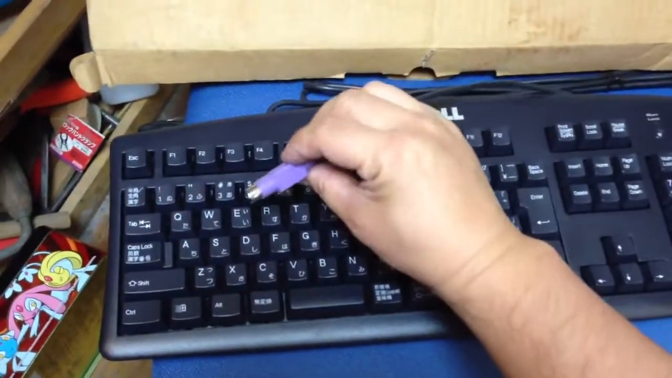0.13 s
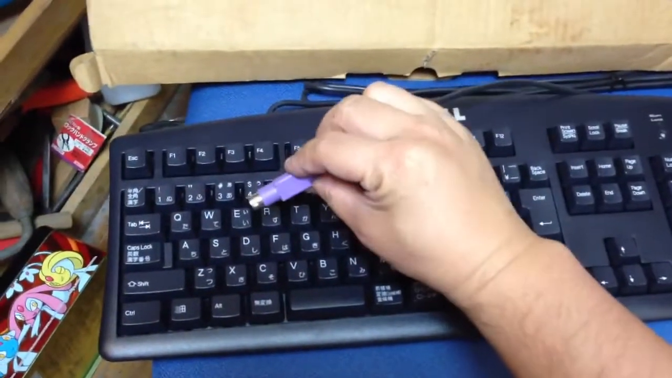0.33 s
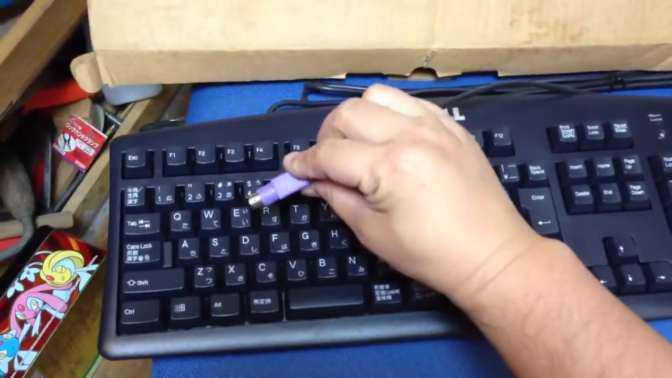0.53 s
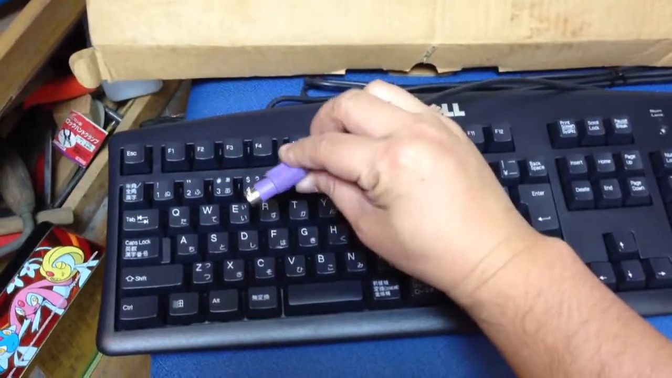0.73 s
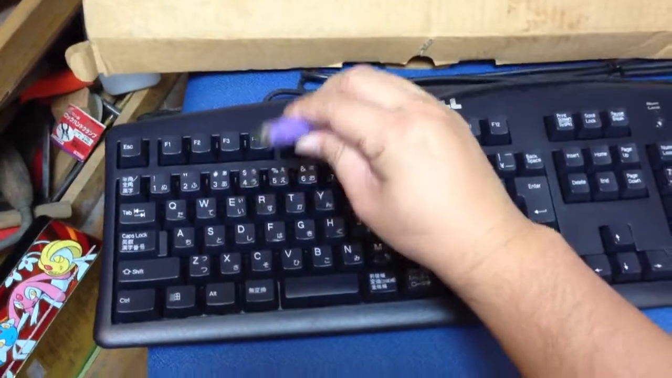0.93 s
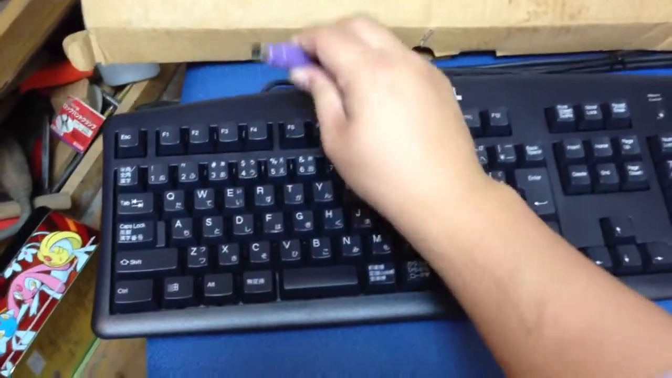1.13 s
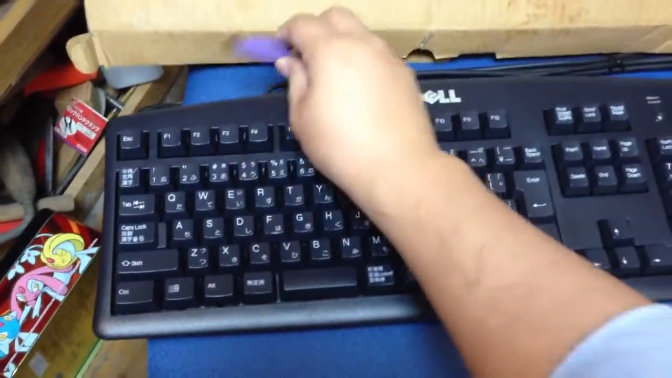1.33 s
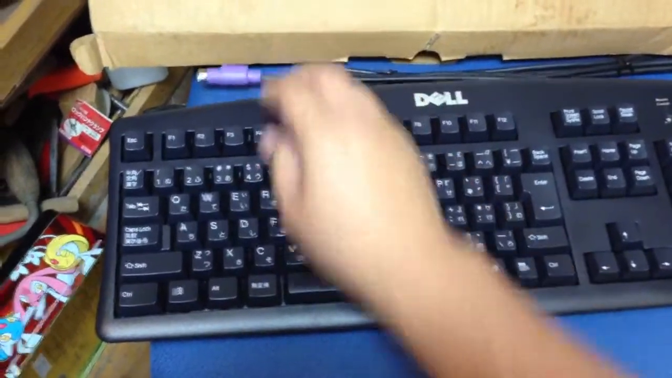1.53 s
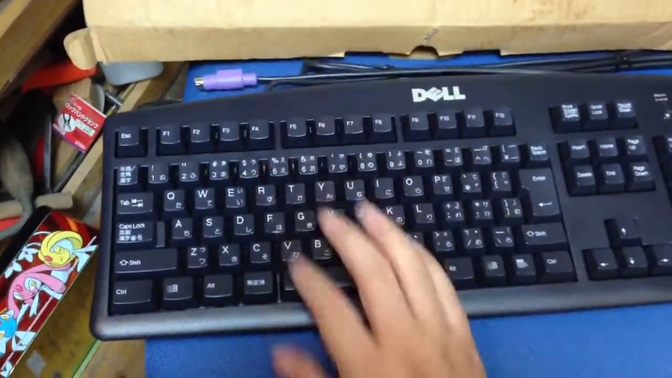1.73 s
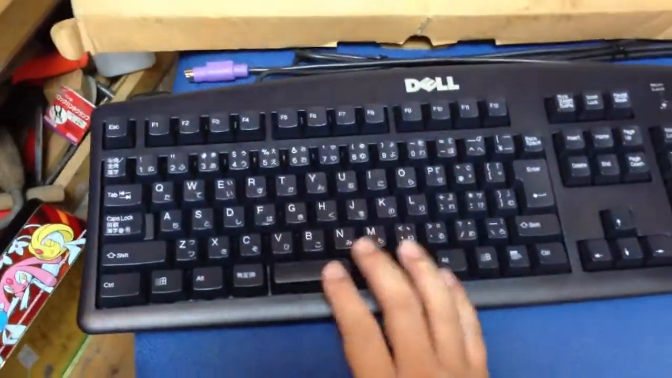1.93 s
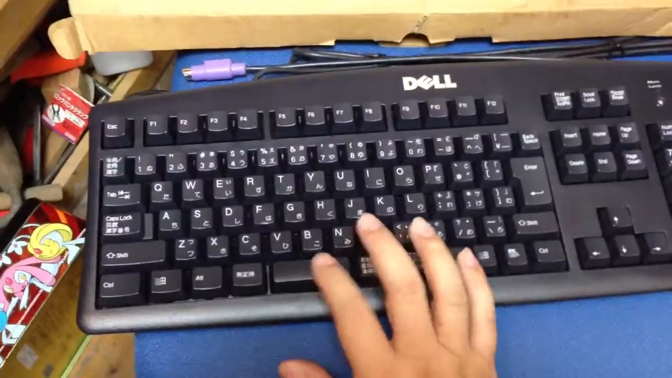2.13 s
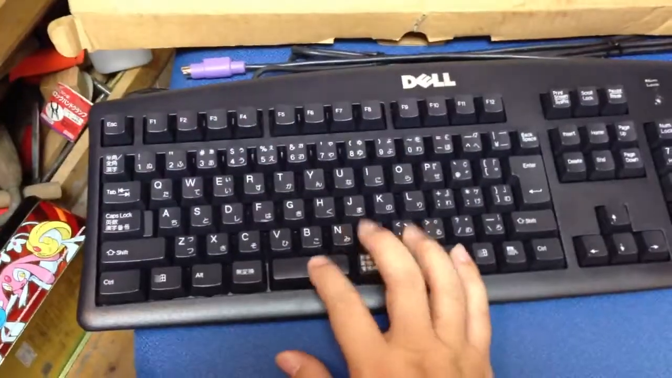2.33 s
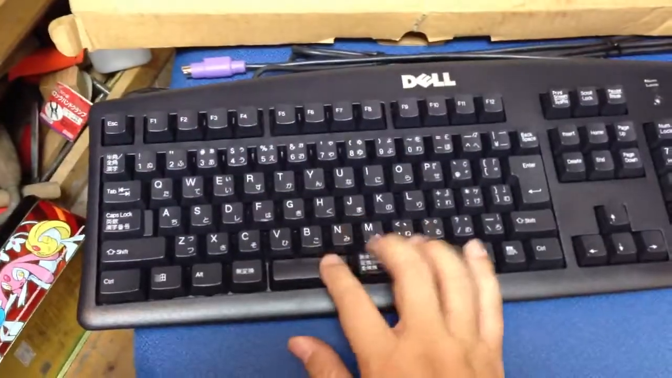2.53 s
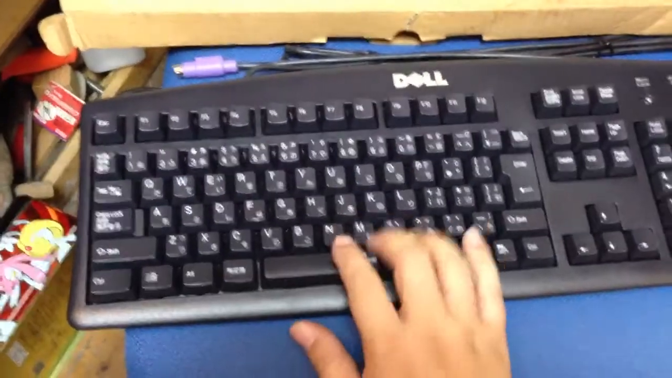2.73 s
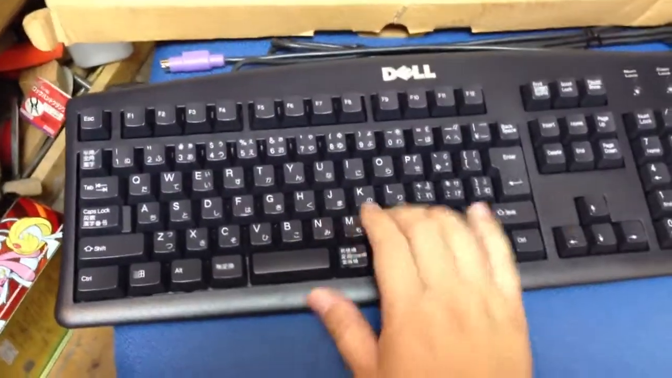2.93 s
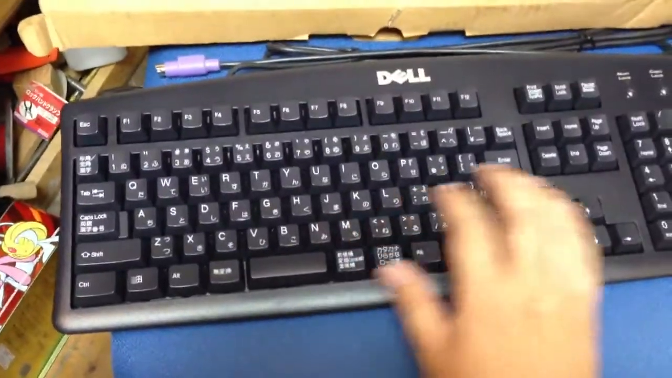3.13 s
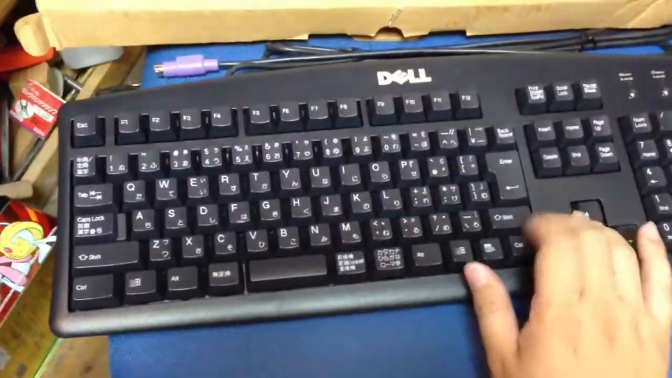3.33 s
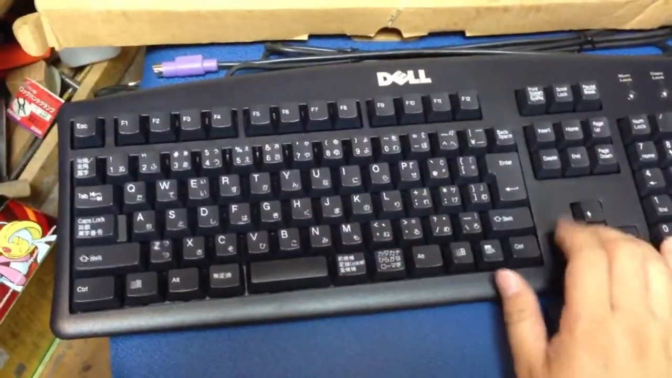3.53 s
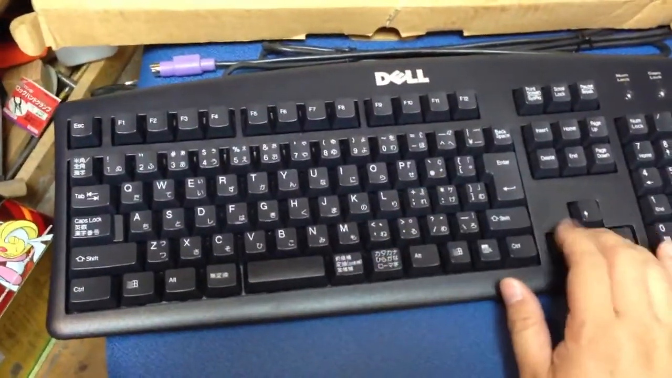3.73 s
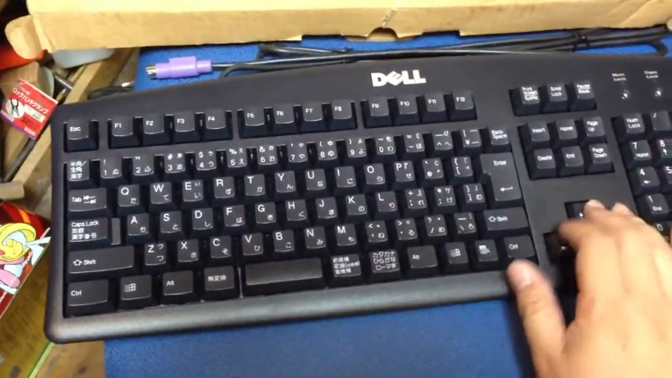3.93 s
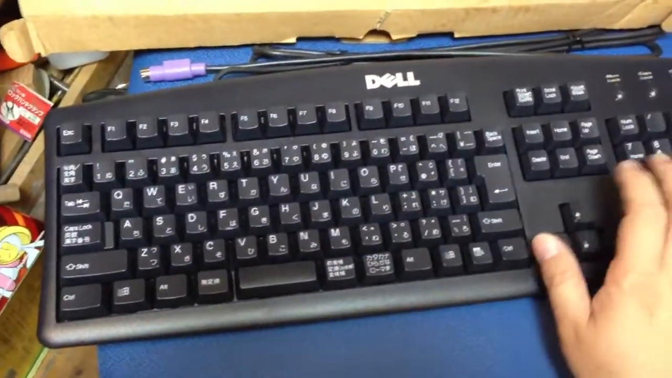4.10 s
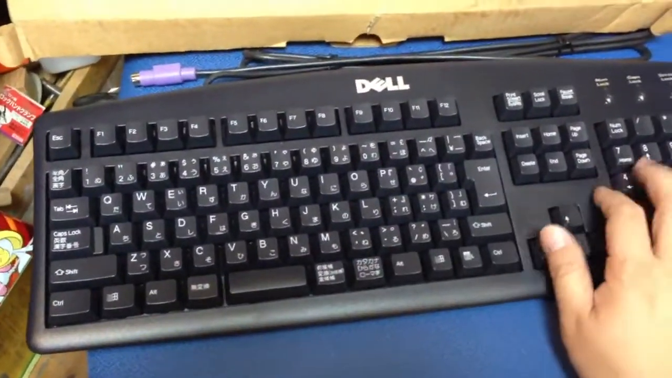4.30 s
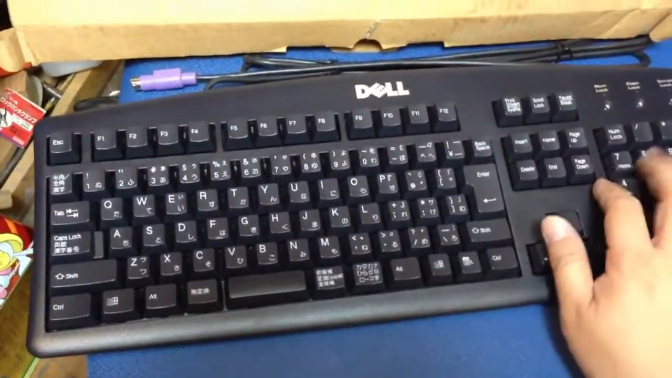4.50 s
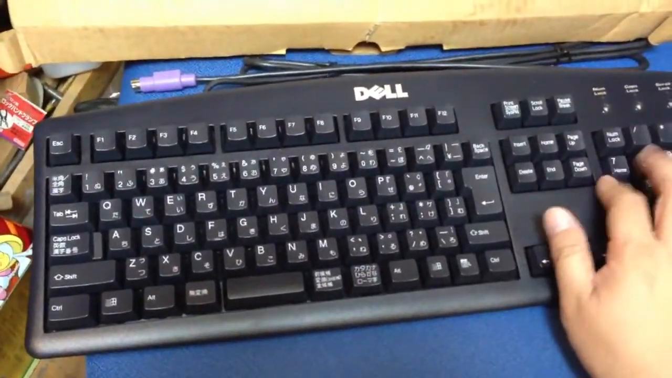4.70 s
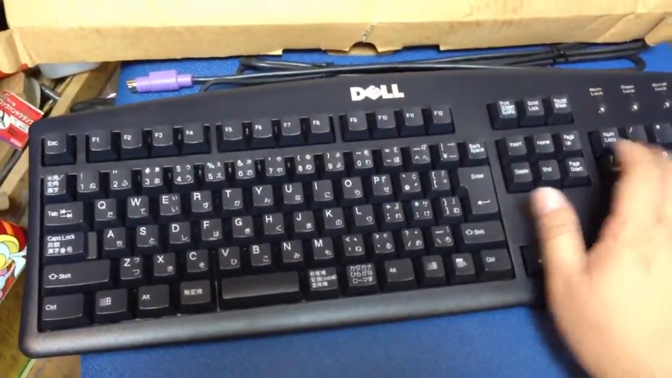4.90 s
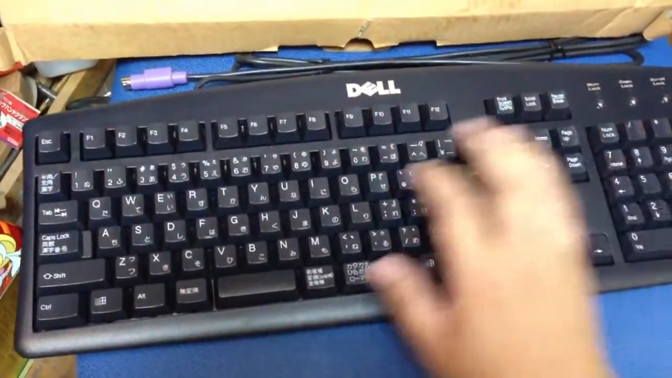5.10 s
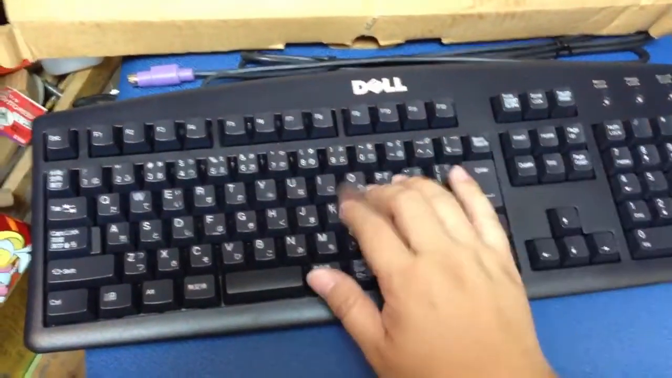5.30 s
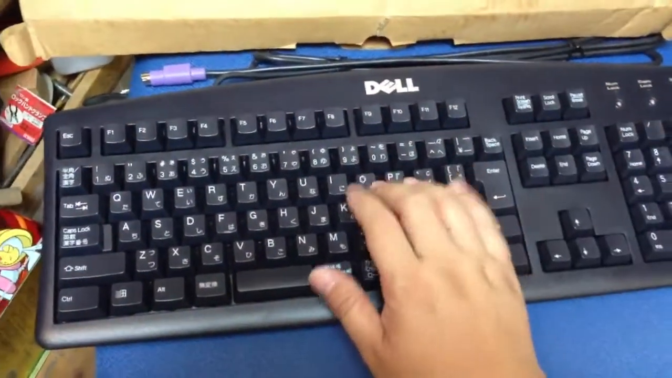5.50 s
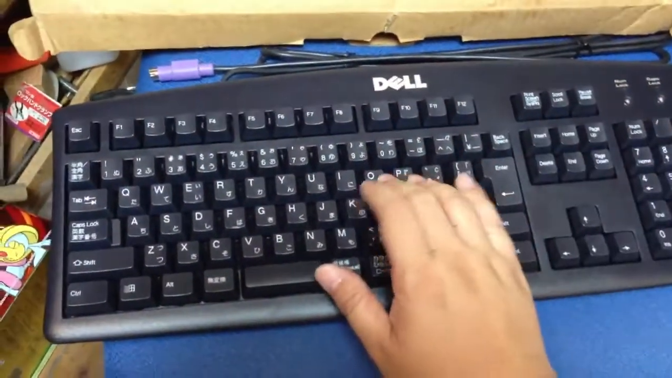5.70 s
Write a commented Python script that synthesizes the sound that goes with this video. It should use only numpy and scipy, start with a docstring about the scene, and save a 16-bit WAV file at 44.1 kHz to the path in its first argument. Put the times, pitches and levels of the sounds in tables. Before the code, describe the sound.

In a quiet room with a low electrical hum and faint fan noise, a close microphone picks up soft rustles of fingers on a plastic plug and its cable. The plug is put down, and typing begins on a computer keyboard: dry, rattly clacks of varying strength, growing denser, pausing briefly, then ending with a few more strokes.

```python
"""Loose keys tapped across a keyboard on a desk, close to the microphone, in a quiet room.
Each stroke is a few contacts (cap, stem, bottoming out, rebound) that rattle the plastic and thud
into the case. Before the typing, a hand turns a small plastic plug over and lays it down.
Desk and walls answer with short echoes; a mains hum and fan noise lie behind it all."""
import sys
import numpy as np
from scipy import signal
from scipy.fft import rfft, irfft, next_fast_len
from scipy.io import wavfile

SR = 44100
rng = np.random.default_rng(int(sys.argv[2]) if len(sys.argv) > 2 else 0)


def materialize(psi):
    """Save the field psi as 16-bit PCM at rate SR to the path in sys.argv[1].

    A 1-D psi becomes a single channel; in a 2-D psi each row is a channel.
    """
    bounded = np.clip(np.atleast_2d(psi).T, -1, 1)
    quanta = np.round(bounded * 32767).astype(np.int16)
    wavfile.write(sys.argv[1], SR, quanta)


N = 253707


def from_db(db):
    """Decibels to gain."""
    return 10 ** (np.asarray(db) / 20)


def unit_rms(x):
    """Scale to rms 1 along the last axis."""
    return x / np.sqrt(np.mean(x ** 2, axis=-1, keepdims=True) + 1e-20)


def unit_energy(rows):
    """Scale each row to a summed power of 1."""
    return rows / np.sqrt(np.sum(rows ** 2, axis=1, keepdims=True))


def at_hz(hz, points_hz, values):
    """Straight lines on a log-frequency axis."""
    return np.interp(np.log(hz), np.log(points_hz), values)


# Noise floor at the microphone: (frequency [Hz], relative density [dB])
FAN_SPECTRUM = [(90, -9.5), (130, -7), (160, 1.5), (178, 5.5), (205, -2.5), (240, -1), (300, -4.5),
                (380, -6.5), (520, -14.5), (720, -10), (1100, -14), (1600, -18.5), (2300, -21.5),
                (3200, -25.5), (8000, -28.5), (15000, -31)]


def fan(level_db):
    """Room tone: low fan rumble that thins into microphone hiss."""
    size = next_fast_len(N)
    hz = np.maximum(np.arange(size // 2 + 1) * SR / size, 1)
    colour = from_db(at_hz(hz, *np.transpose(FAN_SPECTRUM)))
    noise = irfft(rfft(rng.standard_normal(size)) * colour, size)[:N]
    return from_db(level_db) * unit_rms(noise)


def hum(hz, level_db, waver_db, wavers_per_s):
    """The fourth mains harmonic in the background, its level wavering a little."""
    t = np.arange(N) / SR
    drift = np.interp(t * wavers_per_s, np.arange(100), rng.standard_normal(100))
    return from_db(level_db + waver_db * drift) * np.sqrt(2) * np.sin(2 * np.pi * hz * t)


# Echoes around the desk: (frequency [Hz], t60 [s], relative level [dB])
ROOM_DECAY = [(705, 0.11, 5), (1440, 0.097, 2), (4300, 0.11, 3), (8200, 0.072, 2), (12400, 0.1, -1)]


def room_tails(count, size, onset_ms, level_db=-7, walls_db=-21.5, walls_t60_ratio=5.1):
    """Each contact has its own dense tail: the desk answers first, the far walls fainter and longer."""
    t = np.arange(size) / SR
    room_hz, *columns = np.transpose(ROOM_DECAY)
    white = rng.standard_normal((count, size))
    edges_hz = np.geomspace(500, 16000, 11)
    tails = 0
    for low, high in zip(edges_hz, edges_hz[1:]):
        band = signal.sosfilt(signal.butter(2, [low, high], "band", fs=SR, output="sos"), white)
        t60, band_db = (at_hz(np.sqrt(low * high), room_hz, column) for column in columns)
        near = from_db(-60 * t / t60)
        far = from_db(walls_db - 60 * t / t60 / walls_t60_ratio)
        tails = tails + band * from_db(band_db) * (near + far)
    build_up = 1 - np.exp(-t * 1000 / onset_ms)
    return from_db(level_db) * unit_energy(tails * build_up)


def ring(forces, modes, share_db, detune_hz, spread_db):
    """Every row of force rings all modes; no two contacts are tuned or weighted quite alike."""
    hz, mode_db, t60 = np.transpose(modes)[:, None, :, None]
    chance = rng.standard_normal((len(forces), len(modes), 2))
    t = np.arange(round(.08 * SR)) / SR
    decay = from_db(mode_db + share_db + spread_db * chance[..., :1] - 60 * t / t60)
    sign = (-1.) ** np.arange(len(modes))[:, None]
    tones = np.sin(2 * np.pi * (hz + detune_hz * chance[..., 1:]) * t)
    response = np.sum(sign * decay * tones, axis=1)
    return unit_energy(signal.fftconvolve(forces, response, axes=1))


# Low modes of the keyboard case: (frequency [Hz], relative level [dB], t60 [s])
CASE_MODES = [(258.5, -8.5, 0.045), (317, -2, 0.052), (352.3, -1.5, 0.044), (424, -6.5, 0.04),
              (510, -2, 0.039), (605, -8, 0.02)]
# Centres of the deep and the shallow thud: (frequency [Hz])
THUD_BANDS = [304, 467]


def case_thud(push, thud_lean_db):
    """The case thuds under a push; a positive lean favours its deep modes."""
    mode_hz = np.array(CASE_MODES)[:, :1]
    share_db = np.array([at_hz(mode_hz, THUD_BANDS, [lean / 2, -lean / 2]) for lean in thud_lean_db])
    return ring(push, CASE_MODES, share_db, detune_hz=14.1, spread_db=2.5)


# Modes of the key caps and stems: (frequency [Hz], relative level [dB], t60 [s])
CAP_MODES = [(737, -8.5, 0.017), (1140, -9, 0.0066), (1215, -4, 0.0094), (1523, -3.5, 0.013),
             (1744, 1.5, 0.0078), (2100, 2.5, 0.0062), (2398, 1.5, 0.0074), (2746, 1.5, 0.0056),
             (3020, -2, 0.0054), (3290, -7.5, 0.0078), (3835, -4.5, 0.01), (4180, -1.5, 0.01),
             (4720, -0.5, 0.0072), (5350, 3, 0.0064), (6180, 4, 0.0037), (7000, 2.5, 0.0046),
             (8046, 3, 0.0042), (8800, 4, 0.003), (9900, 7.5, 0.0015), (11300, -13, .003),
             (11200, -23, 0.0016), (12470, 0.5, 0.0037), (14100, 8, 0.0012), (13700, 3.5, 0.0021)]
# Band centres of cap edge, deep cap, shallow cap, snap, tick and top: (frequency [Hz])
CAP_BANDS = [800, 1600, 3300, 5400, 7900, 11500]


def strike_plastic(forces, push, start, level_db, lean_db, snap_db, tick_db, top_db,
                   thud_db, thud_lean_db):
    """Forces ring the caps, weighted by where the plastic is touched; the push rings the case."""
    bands_db = np.transpose([(thud_db + lean_db) / 2, lean_db / 2, -lean_db / 2,
                             snap_db, tick_db, top_db])
    mode_hz = np.array(CAP_MODES)[:, :1]
    share_db = np.array([at_hz(mode_hz, CAP_BANDS, row) for row in bands_db])
    caps = ring(forces, CAP_MODES, share_db, detune_hz=108, spread_db=1.8)
    case = from_db(thud_db)[:, None] * case_thud(push, thud_lean_db)
    sound = from_db(level_db)[:, None] * (caps + case)
    index = start[:, None] + np.arange(sound.shape[1])
    return np.bincount(index.ravel(), sound.ravel(), N)[:N]   # add each contact at its start sample


def uneven_clicks(shape, per_s, size_db=3.0):
    """Sparse clicks of random sign and heavy-tailed size; mean power 1 a row."""
    draw = rng.random((*shape, 3))
    occurs = draw[..., 0] < per_s / SR
    size = from_db(size_db * np.minimum(-np.log(draw[..., 1] + 1e-9), 4))
    return unit_rms(occurs * size * np.sign(draw[..., 2] - .5))


def finger_landings(ahead_ms=6, level_db=-54, tick_db=-20, thud_db=-19, half_ms=2.8):
    """The finger brushes the cap just ahead of every stroke: more rows for the rubs."""
    return [(s + (min(other_ms, 0) - ahead_ms) / 1000, level_db, lean_db, tick_db, thud_db, half_ms)
            for s, _, lean_db, *_, other_ms, _ in KEY_STROKES]


# Fingers on plug, cable and caps, close by:
# (centre time [s], relative level [dB], deep-cap lean [dB], tick [dB], thud [dB], half length [ms])
RUBS = [(0.171, -54.5, 5, -5, -12, 20), (0.24, -52, 4, 0, -27, 8.5), (0.368, -54, -5, -5.5, -35, 17),
        (0.821, -59, -2, -4, -18, 8.1), (0.913, -51, 8, -0.5, -9, 15), (1.128, -45, 13, -10, -8, 15),
        (1.17, -59.5, -17, -1, 0.5, 86), (1.206, -50.5, 4, -9, 5, 26), (1.253, -54, 12, -8, -10, 16),
        (1.499, -54, 18, -12, 0, 19), (1.641, -63, 11, -6, -24, 67), (1.864, -51, -2, -9, -2, 7.2),
        (2.768, -51, 0, -22, -9, 7.7), (2.993, -53, 3, -11, -30, 8.3), (3.022, -51.5, 3, -19, -2, 13.4),
        (3.491, -49, 11, -14, -7, 4.5), (3.614, -52, 6, -21, -5, 3.8), (3.66, -48, 9, -14, -17, 7.1),
        (3.991, -45.5, 4, -8, -11, 3.9), (4.023, -48, 26, -15, -8, 4.9), (3.85, -48.5, 7, -9, -9, 9.1),
        (4.179, -43.5, -14, -37, -21, 4.5), (4.508, -51.5, 2, -12, -12, 12), (5.447, -47, -3, -13, -9, 5.9)]


def finger_rubs(top_under_tick_db, thud_lean_db, gain_db):
    """Rubbing is a swell of dense tiny catches, each with its echoes."""
    s, level_db, lean_db, tick_db, thud_db, half_ms = np.transpose(RUBS + finger_landings())
    lead = 5000   # samples before the centre of the swell
    ms = np.arange(-lead, lead) / SR * 1000
    half_ms = np.clip(half_ms, 1, 60)
    swell = np.exp(-(ms / half_ms[:, None]) ** 2)
    catches = swell * uneven_clicks(swell.shape, per_s=5700)
    path = room_tails(count=len(s), size=5000, onset_ms=6.4)
    path[:, 0] = 1   # the direct sound
    forces = signal.fftconvolve(catches, path, axes=1)
    level_db = level_db + 10 * np.log10(half_ms)   # a longer rub carries more energy
    start = np.round(s * SR).astype(int) - lead
    return from_db(gain_db) * strike_plastic(
        forces, forces, start, level_db, lean_db, snap_db=tick_db, tick_db=tick_db,
        top_db=tick_db - top_under_tick_db, thud_db=thud_db, thud_lean_db=np.full_like(s, thud_lean_db))


# The high sheen of the plug and key clicks over time: (time [s], relative level [dB])
CLICK_SHEEN = [(1.45, -24), (1.8, -6), (2.05, -3.5), (2.15, -8), (2.4, -19), (2.7, -4), (3.1, -23),
               (3.4, -20), (3.6, -14), (4.2, -17.5), (4.7, -16), (5.3, -15), (5.7, -14.5)]


def bright_bands(s, tick_db):
    """Levels of a contact's snap and top bands; both rise with its tick."""
    snap_db = -14 + .3 * tick_db
    top_db = np.interp(s, *np.transpose(CLICK_SHEEN)) + .53 * tick_db
    return snap_db, top_db


# On the desk, close by: the plug laid down, then the keys.
# (time of firmest contact [s], relative level [dB], deep-cap lean [dB], tick [dB], thud [dB],
#  rattle decay [ms], other contact's delay [ms], its level under the firmest [dB])
KEY_STROKES = [(1.4497, -34.5, -3, -21, -8, 2.8, 3.5, 20), (1.8186, -28.5, -3, -10, -11, 5.8, 0.5, 18),
               (1.941, -40, -11, -12, -3.5, 6, -5, 1.5), (2.0446, -24.5, -13, -4.5, -7.5, 1.7, 7, 3),
               (2.1435, -36.5, -9.5, -9, -8.5, 3.5, 3, 5), (2.2338, -39, -5.5, -16, 5.5, 4, -6, -3),
               (2.362, -42, -6, -16, 1, 2.3, 1, 22), (2.4307, -21.5, 0.5, -11.5, -19, 5.5, -5.5, 2.5),
               (2.5456, -32, -7, -14, -2.5, 8.5, 22, 10), (2.6817, -27.5, -12, -10.5, -10, 9.2, -15, 0.5),
               (2.7915, -29, 0, -15.5, -12.5, 5.5, -5, 5), (2.8856, -32, 0, -13, -13, 4.5, -3.5, 4.5),
               (3.093, -43, -10, -10, -18, 4.5, 5, 22), (3.304, -28.5, -16, -8.5, -4.5, 5, 10, -1),
               (3.3183, -20, 2.5, -6.5, -4, 2.6, 18, 22), (3.401, -29.5, 6, -6.5, -33, 3, 14, 12.5),
               (3.4291, -38.5, -6, -34, -30, 5, -1, 15), (3.537, -29, 7.5, -14, -38, 7.9, -4.5, 11.5),
               (3.7576, -27.5, -1.5, -16, -13, 4.8, -6.5, 7.5),
               (3.8586, -27.5, -3.5, -17.5, -20, 3.1, -5, 12), (3.9477, -27, 6, -8, -12, 6.3, -8, 2),
               (4.0727, -37, 0.5, -10, -3, 6.3, -3.5, 1.5), (4.1862, -20, -5.5, -10.5, -16, 2.2, 7.5, 2.5),
               (4.2944, -36, 2.5, -4.5, -7, 9.3, 4.5, 19), (4.3276, -35, 10, -6, -4.5, 7.2, 2, 26),
               (4.396, -24, 8, -13.5, -17, 9.2, 5.5, 13), (4.528, -30.5, 13.5, -8, -7.5, 4.3, -3.5, 8),
               (4.6097, -17.5, 2, 1, -15, 2.9, 4.5, 17), (4.7178, -32, -4, -10, -18, 6.3, 9.5, 5),
               (4.8044, -19.5, 0, -12.5, -19.5, 5.4, 14.5, 24), (4.928, -41.5, 5.5, -7, -11, 11, -10, 1),
               (5.2662, -19.5, -7.5, -5, -3.5, 3.3, -7.5, 5.5),
               (5.356, -27, -0.5, -10.5, -10, 5.1, 26.5, 20), (5.464, -25, -5.5, -10.5, -6, 2.6, 9.5, 18),
               (5.5709, -30.5, -10, 3.5, -7.5, 2.1, -5, 7), (5.6427, -29, -5, -12.5, -4.5, 6.5, 6, 12.5),
               (5.699, -41, -5, -11, -10, 5, 3.5, 16)]


def contacts(rebound_ms=19, rebound_spread_ms=6.8, rebound_loss_db=21.5, rebound_rattle_ms=5.7):
    """Each stroke is its firmest contact, one other before or after it, and one bounce of the cap."""
    s, level_db, lean_db, tick_db, thud_db, rattle_ms, other_ms, loss_db = np.transpose(KEY_STROKES)
    bounce_ms = np.maximum(other_ms, 0) + rebound_ms + rebound_spread_ms * rng.uniform(-1, 1, len(s))
    late = np.r_[np.zeros_like(s), np.sign(other_ms), np.ones_like(s)]   # -1 before the firmest, 1 after
    s = np.r_[s, s + other_ms / 1000, s + bounce_ms / 1000]
    level_db = np.r_[level_db, level_db - loss_db, level_db - rebound_loss_db]
    rattle_ms = np.r_[rattle_ms, rattle_ms, np.full_like(rattle_ms, rebound_rattle_ms)]
    # A later contact bottoms out: it sounds deeper and thuds more.
    lean_db = np.tile(lean_db, 3) + 2.5 * late
    tick_db = np.tile(tick_db, 3) + .5 * late
    thud_db = np.tile(thud_db, 3) + 6.5 * late
    thud_lean_db = -15.5 - .48 * level_db   # lighter contacts thud deeper
    snap_db, top_db = bright_bands(s, tick_db)
    return s, level_db, lean_db, snap_db, tick_db, top_db, thud_db, thud_lean_db, rattle_ms


def keys(rattle_db, soft_hz, rise_ms, push_ms, gain_db):
    """The loose cap starts to chatter, hits firmly, rattles on its stem and settles; echoes follow."""
    s, *touch, rattle_ms = contacts()
    lead = 200   # samples of chatter before the hit
    ms = (np.arange(8000) - lead) / SR * 1000
    settle = np.exp(np.minimum(ms / rise_ms, -ms / np.clip(rattle_ms[:, None], .3, 12)))
    rattle = from_db(rattle_db) * settle * uneven_clicks(settle.shape, per_s=4000)
    pole = np.exp(-2 * np.pi * soft_hz / SR)   # rattle touches are gentler, hence duller, than the hit
    forces = signal.lfilter([1 - pole], [1, -pole], rattle)
    forces[:, lead] = 1   # the firm hit
    forces = unit_energy(forces)
    forces[:, lead:] += room_tails(count=len(s), size=len(ms) - lead, onset_ms=2.4)
    # The finger's weight follows the click.
    push = np.maximum(ms, 0) * np.exp(-np.abs(ms) / push_ms) * np.ones_like(forces)
    start = np.round(s * SR).astype(int) - lead
    return from_db(gain_db) * strike_plastic(forces, push, start, *touch)


def scene():
    """One microphone at the desk: keyboard and fingers close by, hum and fan behind."""
    typing = keys(rattle_db=-15, soft_hz=5140, rise_ms=1.0, push_ms=0.43, gain_db=18.5)
    rubbing = finger_rubs(top_under_tick_db=12, thud_lean_db=-0.5, gain_db=15)
    room_tone = hum(hz=240.2, level_db=-50.5, waver_db=1, wavers_per_s=12) + fan(level_db=-55.5)
    return (typing + rubbing + room_tone)[None]


def record(dry):
    """The microphone cuts the bass and adds its own faint low rumble; the top is cut steeply."""
    low_cut_hz, high_cut_hz, rumble_db = 148.5, 15330, -87
    x = signal.sosfilt(signal.butter(4, low_cut_hz, "high", fs=SR, output="sos"), dry)
    rumble_band = signal.butter(2, [40, 150], "band", fs=SR, output="sos")
    x = x + from_db(rumble_db) * unit_rms(signal.sosfilt(rumble_band, rng.standard_normal(N)))
    return signal.sosfilt(signal.ellip(12, .5, 70, high_cut_hz, fs=SR, output="sos"), x)


dry = scene()
out = record(dry)
materialize(out)
```